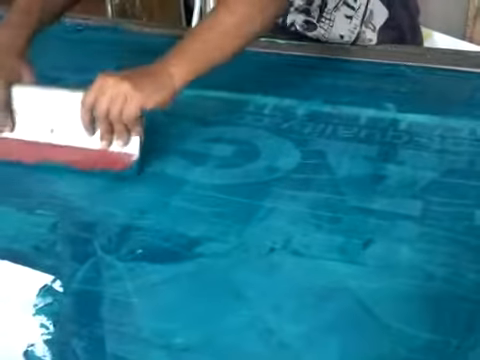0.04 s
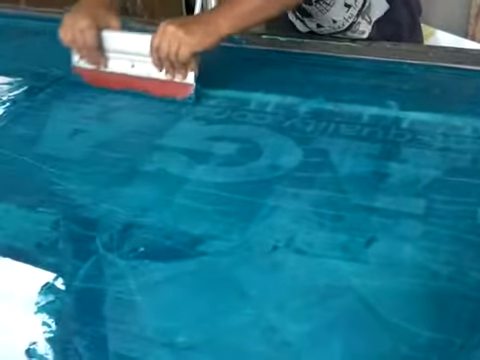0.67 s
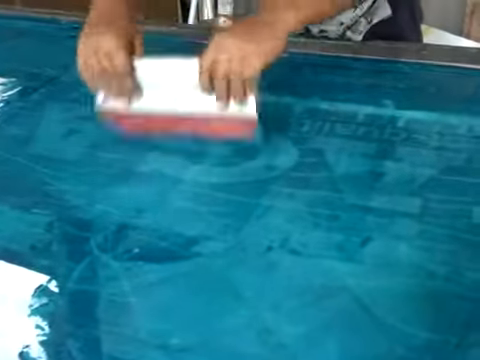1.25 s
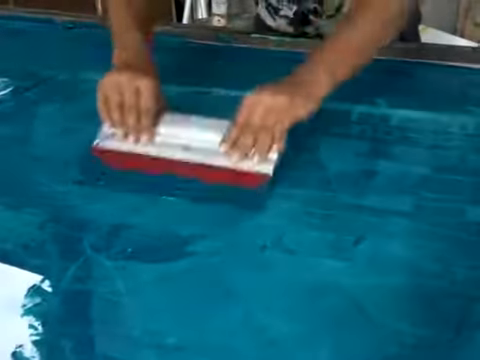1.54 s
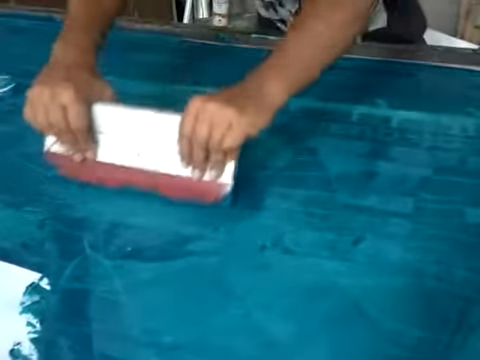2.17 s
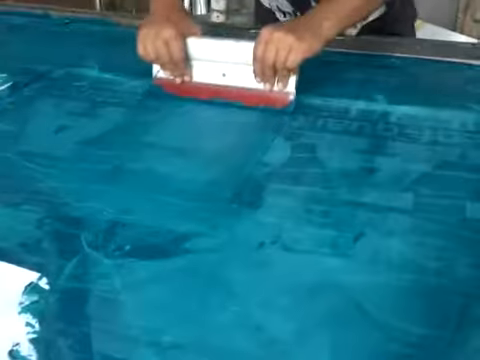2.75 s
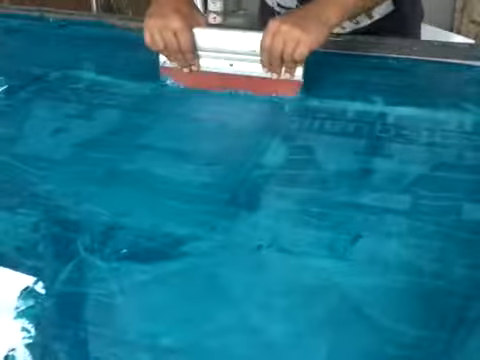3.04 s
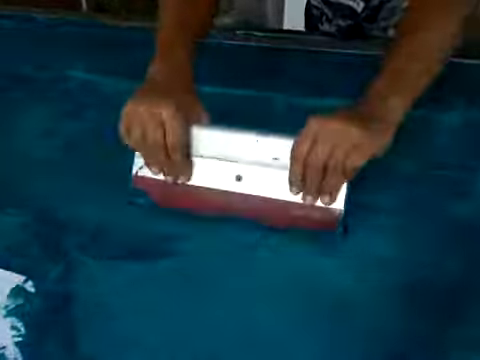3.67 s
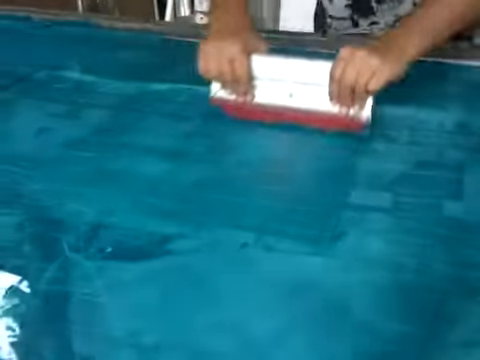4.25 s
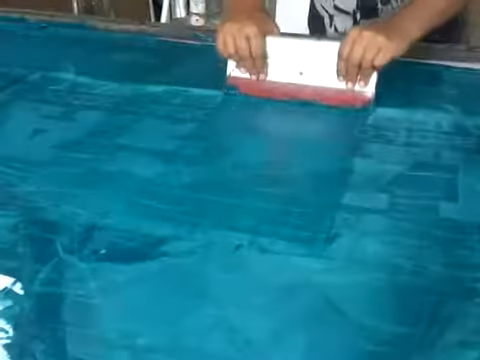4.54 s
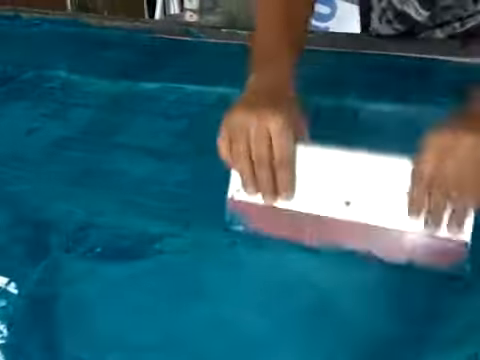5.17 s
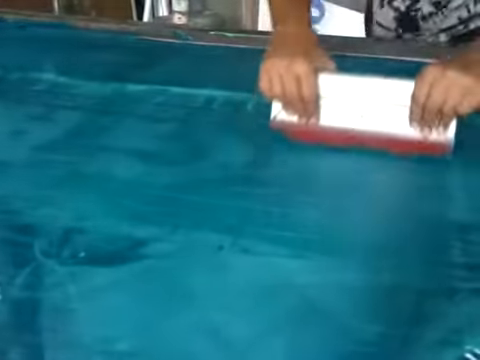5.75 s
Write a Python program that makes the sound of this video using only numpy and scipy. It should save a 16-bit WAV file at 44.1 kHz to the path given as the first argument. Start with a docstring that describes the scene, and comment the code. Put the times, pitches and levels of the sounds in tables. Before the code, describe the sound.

Four zipping, gritty squeegee strokes across an inked mesh screen in a small workshop, separated by dull thumps and thin squeaks.

```python
"""A small workshop: a rubber squeegee is pulled four times over a taut, inked printing screen.
Its edge crosses the threads with a zipping tone that follows the hand's speed and flares into squeals,
over a fine gritty rasp; the rubber catches and chatters in the ink. Between strokes the blade is lifted,
brushes the mesh and is set down, and the screen thumps like a slack drum. Thin squeaks and faint, hollow
hisses glide by, mostly after strokes, over quiet room tone."""
import sys
import numpy as np
from scipy import signal
from scipy.fft import rfft, irfft
from scipy.io import wavfile

SR = 44100
rng = np.random.default_rng(int(sys.argv[2]) if len(sys.argv) > 2 else 0)


def log_audio(samples):
    """Write samples as a 16-bit WAV file to the path given in sys.argv[1]."""
    # one column per channel
    frames = np.atleast_2d(samples).T
    # limit to full scale, then quantise
    limited = np.clip(frames, -1, 1)
    pcm = np.round(limited * 32767).astype(np.int16)
    wavfile.write(sys.argv[1], SR, pcm)


N = 264600
TIME = np.arange(N) / SR

# Hand speed as threads crossed per second, one curve per stroke: t/s, f/Hz
THREAD_RATE = [
    [(0.0, 737), (0.066, 942), (0.164, 1943), (0.338, 2134), (0.556, 1738), (0.606, 1410), (0.952, 1351),
     (1.0, 2055)],
    [(2.12, 473.7), (2.148, 646.5), (2.178, 1340), (2.282, 2516), (2.34, 2621), (2.37, 2265), (2.438, 2660),
     (2.556, 2303), (2.6, 1828), (2.648, 1875), (2.756, 1397), (2.78, 1140), (2.88, 855), (3.006, 742),
     (3.08, 1151), (3.09, 1273)],
    [(3.69, 579.0), (3.72, 844.1), (3.854, 1927), (3.928, 2388), (4.008, 2153), (4.048, 2292), (4.23, 1806),
     (4.246, 1898), (4.43, 1594), (4.51, 1272), (4.542, 1014), (4.638, 1074), (4.68, 1309)],
    [(5.41, 665.5), (5.452, 1346), (5.494, 2210), (5.52, 2710), (5.574, 2465), (5.64, 3031), (5.896, 2486),
     (5.936, 2010), (5.99, 1965)],
]
# Each pull starts firmly and eases as the arms fold; relative levels of the firm part at USUAL_HZ:
# start t/s, attack/s, easing t/s, length/s, grind/dB, rasp/dB, hiss/dB, zip/dB, octave re zip/dB,
# easing/dB, hiss easing/dB, left minus right/dB
PULLS = [(0, 0.017, 0.55, 1.073, -47.5, -36.5, -39, -47, -1, 1, -7.5, -0.5),
         (2.094, 0.17, 2.569, 1.085, -34.5, -25.5, -31, -26.5, -1.5, -5.5, -12, -1),
         (3.687, 0.043, 4.094, 1.05, -39.5, -29.5, -36, -24.5, -3.5, -9, -10.5, 0),
         (5.39, 0.053, 5.62, .75, -38, -34, -37.5, -27, -12, -3.5, -6.5, 1.5)]
# The edge grabs and the zip squeals: t/s, spread/s, fundamental boost/dB, octave boost/dB
EDGE_GRABS = [(2.338, 0.0051, 11, 2), (2.46, 0.017, 11, -3.5), (2.56, 0.027, 11, 3.5),
              (2.608, 0.02, 1.5, 11), (2.72, 0.059, 6, 8.5), (3.971, 0.031, 6, 1.5), (4.035, .02, 2, 5),
              (4.135, 0.032, 3.5, 0.5), (4.615, .025, 6, -0.5), (5.563, 0.04, 1, 8), (5.67, 0.047, 9, 3.5)]
# How well the screen radiates a tone: f/Hz, level/dB
SCREEN_RADIATION = [(500, 6), (1000, -4), (1400, -10), (1800, -9.5), (2400, -6), (3000, -5.5), (3800, 2.5),
                    (4600, -1.5), (5300, 1), (6000, 3)]
# The three friction layers, low to high: f/Hz, level/dB
GRIND_SPECTRUM = [(40, -45.5), (110, -0.5), (220, -1.5), (330, 0), (600, 3.5), (1000, 4), (1500, -1.5),
                  (2000, 0.5), (2600, -2.5), (5000, -34)]
RASP_SPECTRUM = [(900, -18), (1600, -41.5), (2050, 3), (2500, -6.5), (3100, 2.5), (3900, 7), (4600, 6.5),
                 (5400, -28.5), (6700, -25), (8200, -46), (16000, -67)]
HISS_SPECTRUM = [(3500, -6), (5200, 15), (6700, 4.5), (8400, -2), (10300, 4), (12000, 3), (15500, -7)]
# The blade digs into the bead of ink: t/s, spread/s, level/dB
INK_DIGS = [(0.037, 0.022, -32.5), (0.633, 0.033, -26.5), (.81, 0.026, -39), (.98, 0.018, -39),
            (2.755, 0.006, -30), (3.07, 0.026, -20), (4.365, .035, -33.5), (4.589, 0.029, -41),
            (4.652, 0.027, -27)]
# The lifted blade grazes the mesh on its way back: t/s, spread/s, rasp/dB, hiss/dB
MESH_BRUSHES = [(1.317, 0.012, -67, -55), (1.7, 0.026, -49.5, -49.5), (2.006, 0.03, -55.5, -58),
                (5.197, 0.047, -47.5, -51)]
# The blade meets or leaves the screen: t/s, thump level/dB, contact/ms, click level/dB
BLADE_HITS = [(0.028, -36.5, 6.3, -26.5), (0.04, -41, 5, -35.5), (1.505, -40.5, 3.7, -43),
              (1.519, -33.5, 6.6, -71), (1.965, -40, 2.7, -53.5), (1.986, -22.5, 3.13, -41.5),
              (2.004, -21.5, 4.05, -43.5), (2.121, -35.5, 6.7, -72), (3.088, -40.5, 3, -48.5),
              (3.543, -43, 6.2, -46.5), (3.566, -29, 5.7, -35), (3.579, -23, 7, -35),
              (3.603, -35, 3.6, -59), (4.648, -43.5, 2.08, -36.5), (5.236, -29.5, 5.8, -42.5),
              (5.262, -41.5, 4, -47)]
# Drum modes of the stretched screen: f/Hz, level/dB, t60/s
SCREEN_MODES = [(49.4, -6, 0.17), (91.8, -3.5, 0.24), (123, -9.5, 0.39), (169, 0, 0.14), (202, 5, 0.16),
                (247, 0, 0.16), (282, 1, 0.051), (371, -3.5, 0.29), (609, -13, 0.18), (683, -13, .16),
                (806, -10.5, .12)]
# The rubber catches in the ink: t/s, spread/s, ring f/Hz, level/dB
INK_CATCHES = [(.042, 0.014, 856, -25.5), (0.636, 0.044, 1473, -32), (3.062, 0.022, 948.5, -22),
               (3.092, 0.013, 1787, -26), (3.8, 0.013, 1179, -34), (4.642, 0.013, 1120, -32.5),
               (5.431, 0.0098, 910, -33), (5.56, 0.015, 699.5, -33)]
# Thin gliding squeaks: t/s, length/s, from f/Hz, to f/Hz, level/dB
SQUEAKS = [(.972, .03, 3100, 4260, -23.5), (1.305, .045, 6130, 5600, -54), (1.605, .07, 5340, 4630, -46),
           (1.647, 0.1, 2300, 1668, -37.5), (2.049, 0.054, 5580, 5120, -53),
           (4.678, 0.01595, 2750, 3570, -23), (5.361, 0.077, 6380, 5646, -49.5)]
# Faint, hollow bands of midrange hiss, mostly after strokes: t/s, length/s, from f/Hz, to f/Hz, level/dB
HOLLOW_HISSES = [(0.052, 0.19, 1004, 951, -41), (0.967, 0.33, 1197, 894, -48),
                 (0.982, 0.55, 1845, 1385, -45.5), (1.649, .32, 1846, 1798, -45.5),
                 (3.098, .25, 1386, 1200, -45.5), (3.369, .15, 1305, 1450, -53),
                 (4.682, .17, 1300, 1087, -50)]
# Room tone of the workshop: f/Hz, level/dB
ROOM_SPECTRUM = [(15, -46), (25, -9.5), (86, -5.5), (164, -7), (267, -10), (482, -14), (582, -12),
                 (762, -18), (919, -16), (1110, -17.5), (3720, -27), (4380, -28), (15500, -38)]

USUAL_HZ = 2000  # speed tilts the mix: dB per doubling from this thread rate
GRIND_DB_PER_OCT, RASP_DB_PER_OCT, HISS_DB_PER_OCT, ZIP_DB_PER_OCT = -0.5, 4, 2.5, -0.5
GRIND_POWER, ZIP_POWER = 2.1, 2.24  # grind and zip follow the force more steeply than the rasp
EASE_S, HISS_EASE_S, RELEASE_S = 0.063, 0.013, 0.052  # as the force eases, the hiss goes first
CREST_S, CREST_SPREAD_S, CREST_DB = 0.18, 0.05, 5.5  # the hiss crests as the blade gets up to speed
CRISP_HZ, OCTAVE_DB_PER_OCT = 1510, 18.5  # below this rate threads let go softly and the octave fades
DIG_GRIND_DB, DIG_HISS_DB, DIG_ZIP_DB = -15, -10, -9  # relative to the rasp of a dig
DRIFT_DB_PER_S = 6  # the scrape pans left during a pull


def squeegee(zip_db=4.0, friction_db=-1, judder_db=1.0, judder_hz=90, count=3):
    """Stretches of the long edge sound on their own, each from its own place; all judder together."""
    hz = np.interp(TIME, *np.concatenate(THREAD_RATE).T)
    friction_gains, zip_gain, octave_db, pan_db = hand_pull(hz)
    soft_db = OCTAVE_DB_PER_OCT * np.minimum(np.log2(hz / CRISP_HZ), 0)
    partials_db = squeal_boosts() + [radiated_db(hz), radiated_db(2 * hz) + octave_db + soft_db]
    judder = undb(judder_db * walk(judder_hz))
    edge = 0
    for _ in range(count):
        tone = undb(zip_db) * zip_gain * thread_zip(hz, *partials_db)
        scrape = undb(friction_db) * friction(hz, friction_gains)
        edge = edge + workshop(judder * (tone + scrape))
    return edge / np.sqrt(count) * undb(np.array([pan_db, -pan_db]) / 2)


def hand_pull(hz):
    """Force and speed of the hands ride the friction and zip gains; also gives octave level and pan."""
    pulls = np.array(PULLS)
    current = np.searchsorted(pulls[1:, 0], TIME)
    (start, attack, ease_at, length, grind_db, rasp_db, hiss_db, zip_db,
     octave_db, easing_db, hiss_easing_db, pan_db) = pulls[current].T
    release = np.clip((start + length - TIME) / RELEASE_S, 0, 1) ** 2
    contact = np.clip((TIME - start) / attack, 0, 1) * release
    easing_s = np.maximum(TIME - ease_at, 0)
    force_db = easing_db * (1 - np.exp(-easing_s / EASE_S))
    hiss_force_db = hiss_easing_db * (1 - np.exp(-easing_s / HISS_EASE_S))
    crest_db = CREST_DB * swell(start + CREST_S, CREST_SPREAD_S)
    octaves = np.log2(hz / USUAL_HZ)
    grind = contact * undb(grind_db + GRIND_POWER * force_db + GRIND_DB_PER_OCT * octaves)
    rasp = contact * undb(rasp_db + force_db + RASP_DB_PER_OCT * octaves)
    hiss = contact * undb(hiss_db + crest_db + hiss_force_db + HISS_DB_PER_OCT * octaves)
    tone = contact ** ZIP_POWER * undb(zip_db + ZIP_POWER * force_db + ZIP_DB_PER_OCT * octaves)
    for s, spread, brush_rasp_db, brush_hiss_db in MESH_BRUSHES:
        graze = swell(s, spread)
        rasp += undb(brush_rasp_db) * graze
        hiss += undb(brush_hiss_db) * graze
    dig = sum(undb(db) * swell(s, spread) for s, spread, db in INK_DIGS)
    grind = np.hypot(grind, undb(DIG_GRIND_DB) * dig)
    rasp = np.hypot(rasp, dig)
    hiss = np.hypot(hiss, undb(DIG_HISS_DB) * dig)
    tone = np.hypot(tone, undb(DIG_ZIP_DB) * dig)
    return (grind, rasp, hiss), tone, octave_db, pan_db + DRIFT_DB_PER_S * (TIME - start)


def thread_zip(hz, fundamental_db, octave_db, slip=0.0115, sway=0.007, flutter_db=3.5):
    """A stretch of the edge flicks over the threads, slipping a little faster and slower than the hand."""
    partials = [(fundamental_db, 0.47), (octave_db, 0.47)]  # level/dB, phase scatter/rad
    # each thread's sharp release adds weak, smeared overtones above the octave
    partials += [(octave_db - 20 - 4 * k, 0.95 * (k + 1)) for k in range(3)]
    unsteady = (2200 / hz) ** 0.8  # a slow blade sticks and slips more
    rate = hz * (1 + unsteady * (slip * walk(150) + sway * walk(18.21)))
    phase = 2 * np.pi * np.cumsum(rate) / SR
    tone = 0
    # no two threads let go alike: every partial flutters and has a rough skirt
    for harmonic, (db, scatter) in enumerate(partials, 1):
        gain = undb(db + flutter_db * (walk(70) - 1 / 3))
        tone = tone + gain * np.sin(harmonic * phase + scatter * walk(350))
    return np.sqrt(2) * tone


def squeal_boosts():
    """The edge grabs: flares in dB for the zip's fundamental and octave."""
    return sum(np.outer(boosts_db, swell(s, spread)) for s, spread, *boosts_db in EDGE_GRABS)


def radiated_db(hz):
    """Level at which the screen gives off a tone of this pitch."""
    points_hz, db = np.transpose(SCREEN_RADIATION)
    return np.interp(np.log(hz), np.log(points_hz), db)


def friction(hz, gains, slips_per_s=1500, spread_db=1.5, smooth=0.36, wander=0.05):
    """Countless tiny slips of rubber and ink on the mesh, layered as grind, rasp and hiss."""
    layers = []
    for spectrum in (GRIND_SPECTRUM, RASP_SPECTRUM, HISS_SPECTRUM):
        size = undb(spread_db * np.minimum(rng.exponential(size=N), 4))
        slips = (rng.random(N) < slips_per_s / SR) * rng.choice([-1, 1], N) * size
        layers.append(colour(unit(slips) + smooth * rng.standard_normal(N), spectrum))
    grind, rasp, hiss = layers
    # the rasp's pitch follows the speed down to a creep, and wanders with the tilt of the hands
    varispeed = (np.maximum(hz, 1200) / 1750) ** 0.2 * (1 + wander * walk(12))
    rasp = unit(np.interp(np.cumsum(varispeed) % N, np.arange(N), rasp))
    return sum(layer * gain for layer, gain in zip((grind, rasp, hiss), gains))


def screen_thumps(scuff_t60=0.2, click_t60=0.25, click_hz=1100, tick_t60=0.065):
    """Each hit pushes the screen's drum modes; the rubber clicks and scuffs as it settles."""
    t = TIME[:SR // 2]
    ring = sum((-1) ** k * undb(db) * fade(t, t60) * np.sin(2 * np.pi * hz * t)
               for k, (hz, db, t60) in enumerate(SCREEN_MODES))
    out = np.zeros(N + len(t))
    for s, db, contact_ms, click_db in BLADE_HITS:
        scuff, grit = rng.standard_normal((2, len(t)))
        push = np.sin(np.pi * np.minimum(t * 1000 / contact_ms, 1))
        push += 0.19 * unit(lowpass(scuff, 680)) * fade(t, scuff_t60)
        body = signal.fftconvolve(push, ring)[:len(t)]
        body /= np.std(body[:SR // 25])  # the first 40 ms set the level
        dull = unit(lowpass(grit, click_hz)) * fade(t, click_t60) * np.minimum(t / 0.003, 1)
        tick = 0.14 * grit * fade(t, tick_t60)
        start = int(s * SR)
        out[start:start + len(t)] += undb(db) * body + undb(click_db) * (dull + tick)
    return out[:N]


def rubber_chatter(slips_per_s=420, detune_spread=0.15, count=44):
    """Each catch is a quick run of slips; every slip rings the rubber lip at its own pitch."""
    t = TIME[:SR // 20]
    lip_decay = fade(t, t60=0.025)
    out = np.zeros(N)
    for s, spread, hz, db in INK_CATCHES:
        burst = np.zeros(N)
        for k, (late, detune, size) in enumerate(rng.standard_normal((count, 3))):
            offset = (k - count / 2 + late / 2) / slips_per_s
            start = max(int((s + offset) * SR), 0)
            ring = lip_decay * np.sin(2 * np.pi * hz * np.exp(detune_spread * detune) * t)
            burst[start:start + len(t)] += ring * undb(2 * size) * np.exp(-(offset / spread) ** 2 / 2)
        out += burst * undb(db) / np.sqrt(np.sum(burst ** 2) / (2 * spread * SR))
    return out


def squeaks(waver=0.019):
    """Thin, slightly rough tones that swell, glide and stop."""
    roughness = 1 + waver * walk(290)
    out = np.zeros(N)
    for s, length, from_hz, to_hz, db in SQUEAKS:
        along = np.clip((TIME - s) / length, 0, 1)
        hz = (from_hz + (to_hz - from_hz) * along) * roughness
        out += undb(db) * np.sin(np.pi * along) * np.sin(2 * np.pi * np.cumsum(hz) / SR)
    return out


def hollow_hiss(width_hz=330):
    """Faint, narrow bands of midrange hiss that swell quickly, glide and die away."""
    sine_noise, cosine_noise = (unit(lowpass(lowpass(noise, width_hz), 2 * width_hz))
                                for noise in rng.standard_normal((2, N)))
    out = np.zeros(N)
    for s, length, from_hz, to_hz, db in HOLLOW_HISSES:
        along = np.clip((TIME - s) / length, 0, 1)
        phase = 2 * np.pi * np.cumsum(from_hz + (to_hz - from_hz) * along) / SR
        envelope = np.sin(np.pi * along ** 0.41) ** 2
        out += undb(db) * envelope * (sine_noise * np.sin(phase) + cosine_noise * np.cos(phase))
    return out


def frame_ring(x, send_db=-19, t60=0.51, band_hz=(850, 1900)):
    """The frame and its stretched mesh ring on briefly in the mids, in many close modes."""
    decay = fade(TIME[:SR // 2], t60)
    band = signal.butter(3, band_hz, "band", fs=SR, output="sos")
    modes = signal.sosfilt(band, rng.standard_normal((2, len(decay))) * decay) / np.linalg.norm(decay)
    return x + undb(send_db) * signal.oaconvolve(x, modes, axes=1)[:, :N]


def workshop(x, early_db=-3, early_t60=0.034, tail_send_db=-16, tail_t60=0.32, tail_hz=3200):
    """Direct sound, a touch earlier on the left; each side has its own reflections and short tail."""
    t = TIME[:SR // 3]
    # long waves reach both sides alike, so the early reflections scatter only the treble
    treble = signal.butter(2, 1100, "high", fs=SR, output="sos")
    sides = []
    for lag_samples in (0, 6):
        early, tail = rng.standard_normal((2, len(t)))
        early = signal.sosfilt(treble, early * fade(t, early_t60))
        tail = tail * fade(t, tail_t60) * np.minimum(t / 0.023, 1)
        response = undb(early_db) * early / np.linalg.norm(early)
        response += lowpass(undb(tail_send_db) * tail / np.linalg.norm(tail), tail_hz)
        response[lag_samples] += 1
        sides.append(signal.oaconvolve(x, response / np.linalg.norm(response))[:N])
    return np.array(sides)


def room_tone(mid_db=-62, side_db=-7, waver_db=1):
    """A quiet, gently wavering bed of room noise."""
    mid, side = (colour(rng.standard_normal(N), ROOM_SPECTRUM) for _ in range(2))
    return undb(mid_db + waver_db * walk(5.1)) * (mid + undb(side_db) * np.array([side, -side]))


def undb(db):
    """Decibels to gain."""
    return 10 ** (np.asarray(db) / 20)


def unit(x):
    """Scale to rms 1."""
    return x / np.sqrt(np.mean(x ** 2))


def colour(x, spectrum):
    """EQ by a curve of (f/Hz, level/dB) points, to rms 1."""
    hz, db = np.transpose(spectrum)
    bins = np.maximum(np.fft.rfftfreq(N, 1 / SR), 1)
    return unit(irfft(rfft(x) * undb(np.interp(np.log(bins), np.log(hz), db)), N))


def walk(hz):
    """Random modulator of rms 1 that wavers at up to about this rate."""
    steps = np.arange(N) * 2 * hz / SR
    points = rng.standard_normal(N // 8)
    return unit(np.interp(steps, np.arange(len(points)), points))


def fade(t, t60):
    """Exponential decay, 60 dB in t60 seconds."""
    return np.exp(-np.log(1000) * t / t60)


def swell(s, spread):
    """A bell-shaped rise and fall around a moment."""
    return np.exp(-np.minimum(((TIME - s) / spread) ** 2, 80) / 2)


def lowpass(x, hz):
    """Gentle two-pole low-pass."""
    return signal.sosfilt(signal.butter(2, hz, fs=SR, output="sos"), x)


def scene(shelf_db=-3, shelf_hz=3500):
    """Squeegee and screen over the room tone; a high shelf darkens their right side."""
    strokes = squeegee()
    accents = workshop(screen_thumps() + rubber_chatter() + squeaks() + hollow_hiss())
    left, right = frame_ring(strokes + accents)
    lows = signal.sosfiltfilt(signal.butter(1, shelf_hz, fs=SR, output="sos"), right)
    right = lows + undb(shelf_db) * (right - lows)
    return np.array([left, right]) + room_tone()


def record(dry):
    """A steep high cut at 15.9 kHz on the whole mix."""
    return signal.sosfilt(signal.ellip(10, 0.2, 80, 15900, fs=SR, output="sos"), dry)


dry = scene()
out = record(dry)
log_audio(out)
```